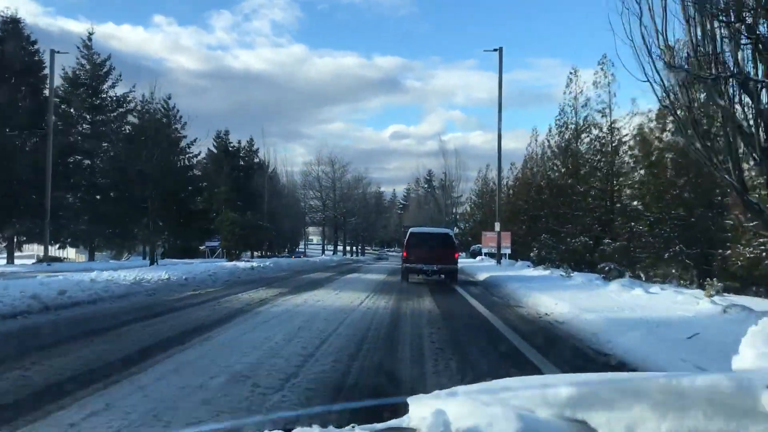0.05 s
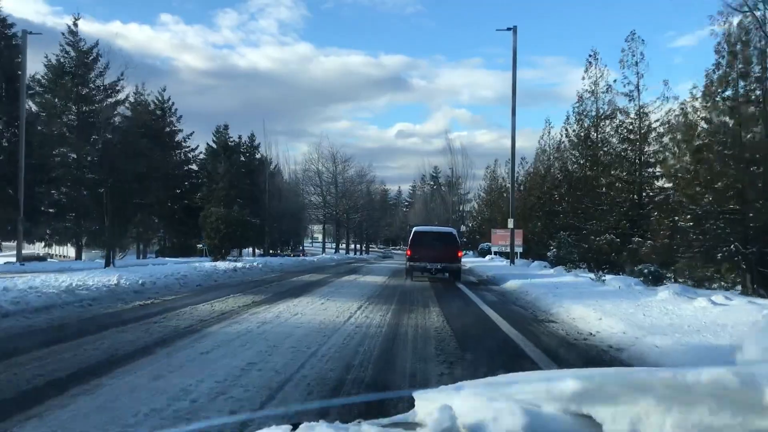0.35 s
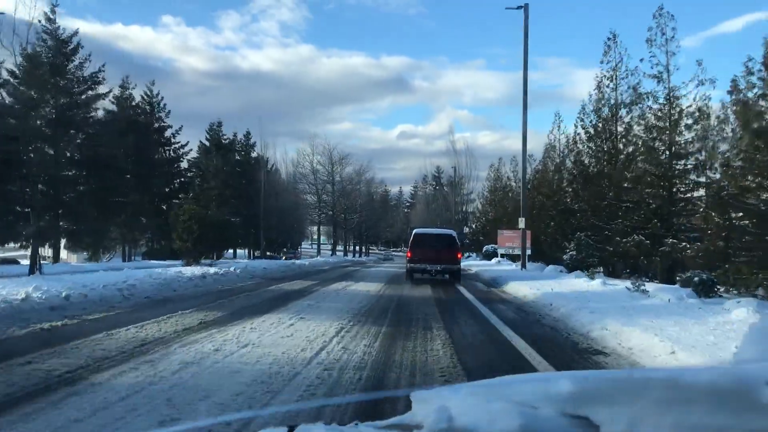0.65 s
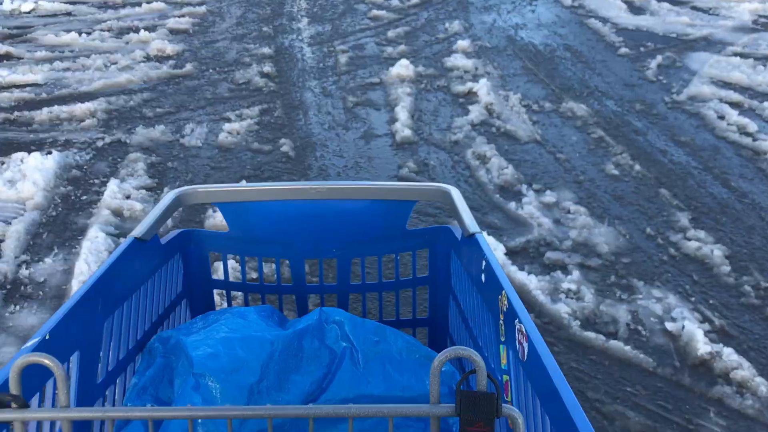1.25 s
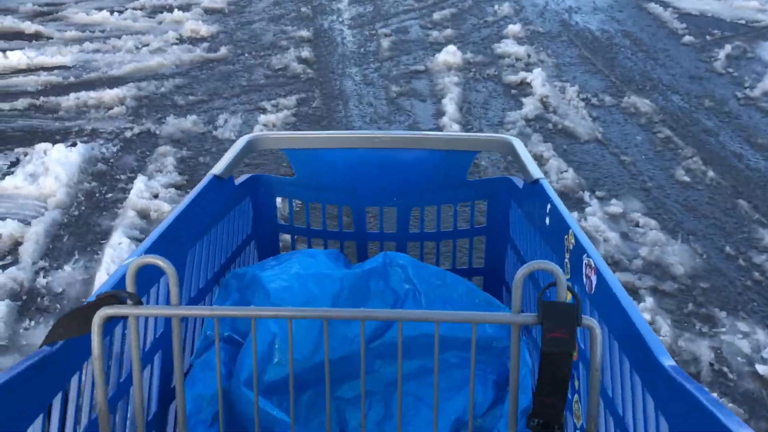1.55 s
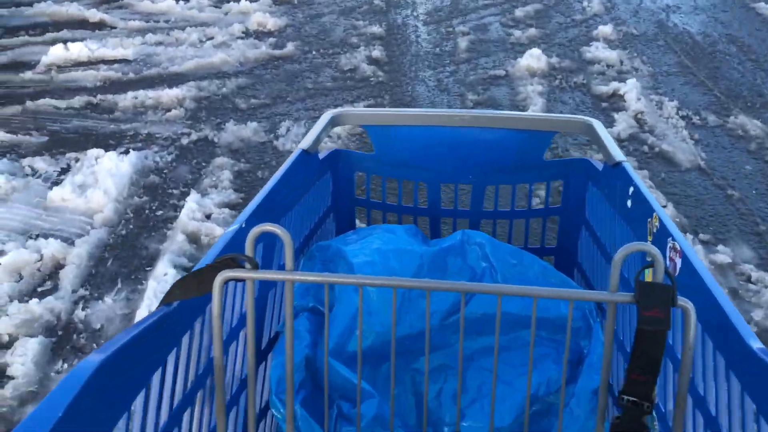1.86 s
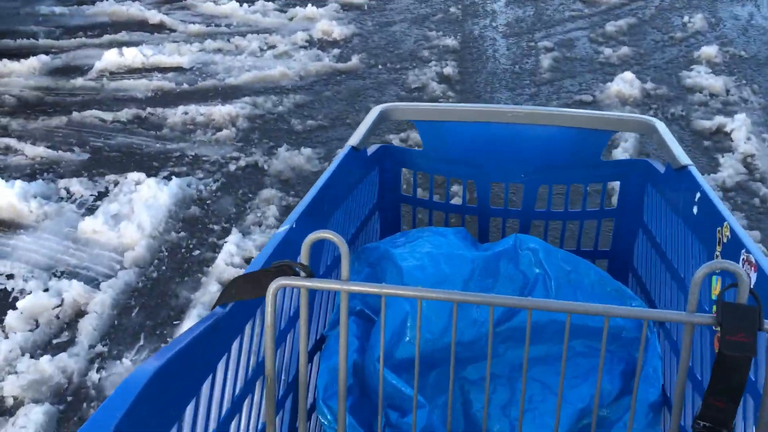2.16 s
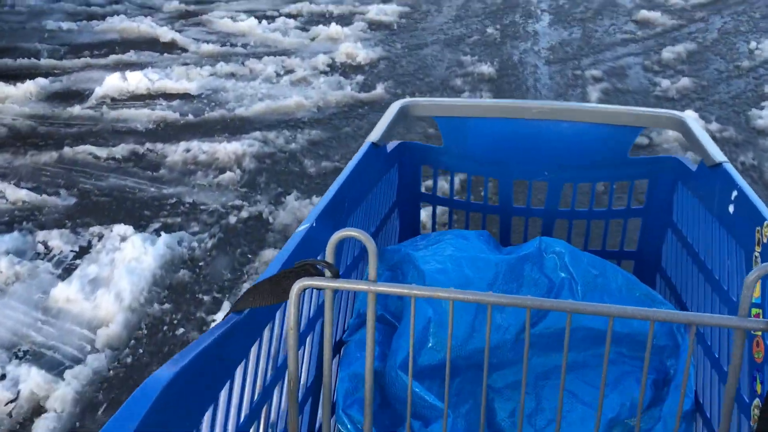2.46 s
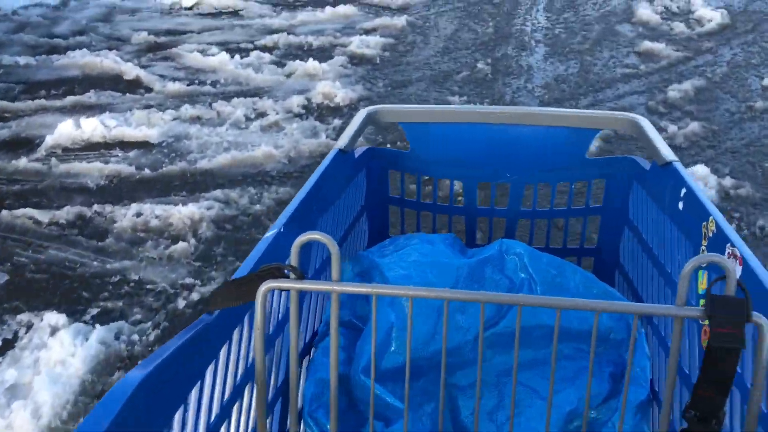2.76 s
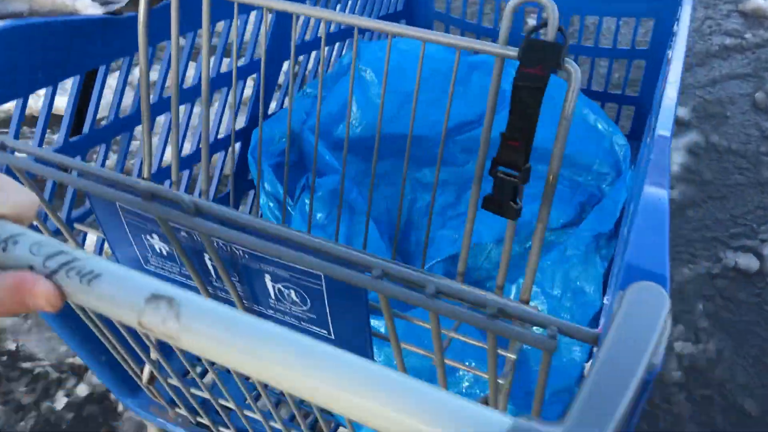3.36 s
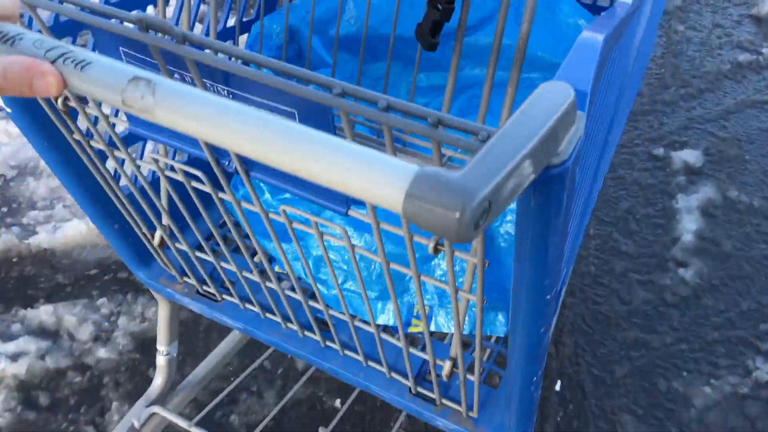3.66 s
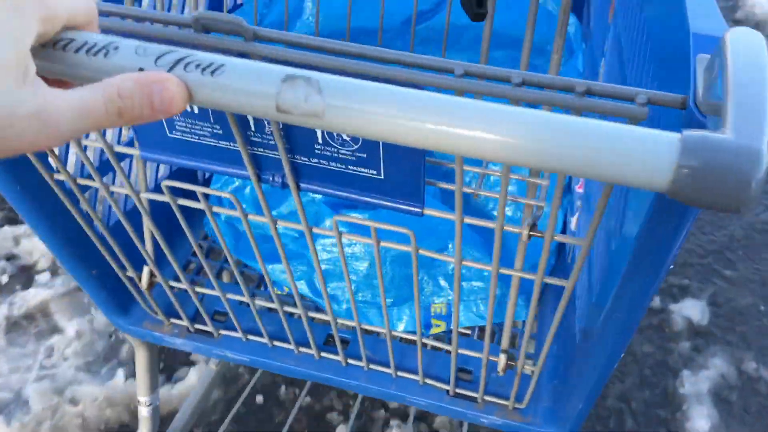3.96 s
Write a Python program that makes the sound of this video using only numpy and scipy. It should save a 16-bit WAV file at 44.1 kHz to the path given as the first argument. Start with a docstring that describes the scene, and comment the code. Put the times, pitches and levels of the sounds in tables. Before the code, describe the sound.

Brief car cabin rumble cuts to a plastic shopping cart clattering across slushy pavement.

```python
"""Inside a car on a snowy road: the cabin rumbles and the tyres hiss faintly. At 1.3 s, an abrupt change to
a plastic shopping cart pushed over slushy pavement. Its wheels crunch, the wire gate and casters rattle
in bright bursts, ruts thump the basket and it clacks on its frame. Ice snaps near 1.6 s, then the wheels
skid now and then. Three jolts ring the basket walls; the loudest rattle and clack come near 3.8 s."""
import sys
import numpy as np
from scipy import signal
from scipy.fft import rfft, irfft
from scipy.io import wavfile
from scipy.ndimage import uniform_filter1d

SR = 44100
rng = np.random.default_rng(int(sys.argv[2]) if len(sys.argv) > 2 else 0)


def wav_out(sig):
    """Save sig, one row per channel (or a flat mono array), as 16-bit PCM at SR to the path in sys.argv[1]."""
    wavfile.write(sys.argv[1], SR, np.round(np.clip(np.atleast_2d(sig).T, -1, 1) * 32767).astype(np.int16))


N = 176400
T = np.arange(N) / SR
CART_START_S, TOP_HZ = 1.306, 15880
GRAINS_PER_S, GRAIN_SPREAD_DB = 6000, 2.3
CONTACTS_PER_S, CONTACT_SPREAD_DB, CONTACT_T20_S, CLICK_ENERGY_RATIO = 1500, 2.5, 0.016, 0.23


def undb(db):
    """Decibels to gain."""
    return 10 ** (np.asarray(db) / 20)


def unit_rms(x):
    """Scale to rms 1."""
    return x / np.sqrt(np.mean(x ** 2) + 1e-18)


def level_curve(rows, column=1):
    """Gain over time from a table's dB column."""
    rows = np.array(rows)
    return undb(np.interp(T, rows[:, 0], rows[:, column]))


def colour(x, spectrum, tilt_db_per_oct=0):
    """Filter by (Hz, dB) points and a tilt, 24 dB per octave down beyond the ends; rms 1."""
    hz, db = np.array(spectrum).T
    octave = np.log2(np.fft.rfftfreq(len(x), 1 / SR) + 1)
    in_band = np.clip(octave, np.log2(hz.min()), np.log2(hz.max()))
    gain_db = np.interp(in_band, np.log2(hz), db) + tilt_db_per_oct * in_band - 24 * abs(octave - in_band)
    return unit_rms(irfft(rfft(x) * undb(gain_db), len(x)))


def drift(rate_hz):
    """Slow random drift; rms 1."""
    hold = max(int(SR / rate_hz), 1)
    steps = np.repeat(rng.standard_normal(N // hold + 1), hold)
    return unit_rms(uniform_filter1d(steps, hold)[:N])


def grains(n, per_s, spread_db):
    """Tiny impacts at random moments: many weak, a few strong."""
    size = undb(spread_db * np.minimum(rng.exponential(size=n), 3.3))
    return (rng.random(n) < per_s / SR) * size * rng.choice([-1, 1], n)


def chatter(n, parts=3):
    """Loose parts touch repeatedly; each contact clicks and rings briefly."""
    t, out = T[:SR // 16], 0
    for _ in range(parts):
        ring = unit_rms(rng.standard_normal(len(t)) * undb(-20 * t / CONTACT_T20_S)) / np.sqrt(len(t))
        ring[0] += np.sqrt(CLICK_ENERGY_RATIO)
        contacts = grains(n + len(t), CONTACTS_PER_S / parts, CONTACT_SPREAD_DB)
        out = out + signal.fftconvolve(contacts, ring)[len(t):len(t) + n]
    return out


def burst(rise_s, fall_db_per_s):
    """Envelope: linear rise, exponential fall."""
    t = T[:SR // 2]
    return np.minimum(t / rise_s, 1) * undb(-fall_db_per_s * np.maximum(t - rise_s, 0))


def add(out, start_s, sound):
    """Mix a sound in at start_s."""
    i = int(start_s * SR)
    out[i:i + len(sound)] += sound[:N - i]


def resonate(drive, modes):
    """Decaying modes, each at its level relative to the drive."""
    t, out = T[:SR // 3], 0
    for hz, db, t60_s in modes:
        ring = np.sin(2 * np.pi * hz * t) * undb(-60 * t / t60_s)
        out = out + undb(db) * unit_rms(signal.fftconvolve(drive, ring)[:N])
    return np.std(drive) * out


# Cabin and tyre spectra: freq_hz, density_db
CABIN_SPECTRUM = [(20, -40), (28, -10), (36, -3.5), (50, 1.5), (64, 0.5), (88, -5), (108, -1.5), (127, 1.5),
                  (145, -10), (175, -29)]
TYRE_SPECTRUM = [(150, 21.5), (200, 24.5), (262, 22), (300, 19), (330, 16.5), (420, 6.5), (560, 8.5),
                 (750, 5.5), (1000, 4.5), (1600, -7), (2700, -8.5), (4500, -13), (6500, -19), (9500, -21.5),
                 (10500, -27), (16000, -28.5)]
# Cabin and tyre levels: time_s, level_db
CABIN_LEVEL = [(0, -18), (.14, -24.5), (.28, -24), (.42, -26.5), (.53, -31.5), (.95, -29), (1.3, -30.5)]
TYRE_LEVEL = [(0, -36.5), (.37, -39), (.7, -39), (1.3, -39.5)]

def car():
    """The cabin booms as the body shakes; tyres roar and hiss faintly through the glass."""
    cabin = colour(rng.standard_normal(N), CABIN_SPECTRUM) * level_curve(CABIN_LEVEL)
    tyres = colour(rng.standard_normal(N), TYRE_SPECTRUM) * level_curve(TYRE_LEVEL)
    return cabin + tyres * undb(0.29 * drift(rate_hz=10.4))


# Rolling on slush: time_s, crunch_db, rumble_db
ROLL_LEVELS = [(1.31, -38, -51), (1.45, -38, -44.5), (1.68, -36.5, -46), (1.78, -37, -39.5),
               (1.92, -34.5, -39.5), (2.08, -37.5, -38), (2.2, -35.5, -36), (2.3, -39, -37),
               (2.38, -34.5, -41), (2.52, -30.5, -33), (2.6, -36, -35), (2.82, -34.5, -39),
               (2.99, -38.5, -39), (3.17, -36, -41), (3.29, -33, -40.5), (3.37, -31, -33.5),
               (3.56, -33, -33), (3.66, -31, -36), (3.85, -29.5, -34.5), (4.0, -31, -37.5)]
# Wheel crunch spectrum: freq_hz, density_db
CRUNCH_SPECTRUM = [(150, -16), (300, 0.5), (450, -3), (700, 1.5), (850, -1.5), (1200, 4.5), (2000, 1),
                   (3000, 0), (4500, -4), (6500, -10.5), (9000, -9), (16000, -37)]

def wheel_crunch(flicker_db=1.4):
    """Icy grains crush under the wheels in uneven patches."""
    crunch = colour(grains(N, GRAINS_PER_S, GRAIN_SPREAD_DB), CRUNCH_SPECTRUM)
    return crunch * level_curve(ROLL_LEVELS) * undb(flicker_db * drift(rate_hz=45))


# Basket rumble spectrum: freq_hz, density_db
RUMBLE_SPECTRUM = [(22, -36), (35, -5), (50, 2.5), (85, -2.5), (115, -7), (170, -9.5), (280, -15),
                   (400, -21), (900, -52)]

def basket_rumble():
    """Rough ground shakes the basket."""
    return colour(rng.standard_normal(N), RUMBLE_SPECTRUM) * level_curve(ROLL_LEVELS, column=2)


# Wheel skids: start_s, level_db, rise_s
SKIDS = [(1.735, -35, .025), (1.810, -32.5, 0.011), (1.875, -33.5, .03), (2.105, -39, 0.0094),
         (2.654, -39, 0.011), (2.772, -29.5, .03), (2.915, -35.5, 0.014), (3.348, -31, 0.016),
         (3.805, -28.5, 0.04)]
# Skid spectrum: freq_hz, density_db
SKID_SPECTRUM = [(450, -27), (950, 0), (1400, 0), (2100, 1.5), (2800, -4.5), (4200, -7.5), (6000, -25)]

def wheel_skids():
    """A wheel slides sideways and grinds through the slush."""
    out = np.zeros(N)
    for start_s, db, rise_s in SKIDS:
        envelope = burst(rise_s, fall_db_per_s=260)
        grind = colour(grains(len(envelope), GRAINS_PER_S, GRAIN_SPREAD_DB), SKID_SPECTRUM)
        add(out, start_s, undb(db) * envelope * grind)
    return out


# Ice snaps: start_s, peak_db
SNAPS = [(1.6147, -21), (1.6236, -19), (1.6483, -15), (1.681, -25)]
# Snap spectrum: freq_hz, density_db
SNAP_SPECTRUM = [(1500, -8), (4500, -8), (7000, -3), (9000, 1), (10500, -13), (16000, -11)]

def ice_snaps(fizz_db=-12.5, fall_db_per_s=1100):
    """Ice breaks under a wheel: one sharp crack and a short fizz."""
    out, t = np.zeros(N), T[:SR // 16]
    for start_s, peak_db in SNAPS:
        snap = undb(fizz_db - fall_db_per_s * t) * rng.standard_normal(len(t))
        snap[SR // 2000] += 1  # the crack
        snap = colour(snap, SNAP_SPECTRUM)
        add(out, start_s, undb(peak_db) * snap / abs(snap).max())
    return out


# Hollow basket bumps: start_s, level_db
BUMPS = [(2.132, -21.5), (3.338, -26.5), (3.655, -24)]
# Basket wall modes: pitch_hz, gain_db, t60_s
WALL_MODES = [(148, -2, 0.086), (253, -5, 0.17), (313, -4, 0.098)]

def wall_bumps(rise_s=0.0083, detune_spread=0.024):
    """Hard jolts flex the basket walls, which give a short hollow note."""
    out, t = np.zeros(N), T[:SR // 4]
    for start_s, db in BUMPS:
        note = 0
        for hz, gain_db, t60_s in WALL_MODES:
            detuned_hz = hz * (1 + detune_spread * rng.standard_normal())
            note = note + undb(gain_db - 60 * t / t60_s) * np.sin(2 * np.pi * detuned_hz * t)
        add(out, start_s, undb(db) * np.minimum(t / rise_s, 1) * note)
    return out


# Rut thumps: start_s, level_db, pitch_hz, knock_relative_db
THUMPS = [(1.447, -30, 62, -3), (1.924, -34, 56.6, -2.5), (2.003, -27.5, 65.4, -5),
          (2.147, -24.5, 56.3, -9), (2.432, -25.5, 61, -4), (2.610, -19.5, 72, -13), (2.735, -23, 92, -10),
          (2.83, -17, 68, -14), (2.893, -25, 64, -26), (2.936, -25.5, 70.6, -12), (3.03, -28.5, 93, -4.5),
          (3.078, -27.5, 59.5, -17), (3.327, -19.5, 78, -5.5), (3.485, -20.5, 85, -4.5),
          (3.534, -23, 89, -20), (3.583, -20, 78, -6)]
# Dull knock spectrum: freq_hz, density_db
KNOCK_SPECTRUM = [(70, -18), (115, 7.5), (170, -10), (300, -5.5), (500, -26), (1000, -43)]

def rut_thumps(trim_db=-3):
    """Each rut knocks the basket and sets it swinging for a few cycles."""
    out = np.zeros(N)
    swing = burst(rise_s=0.01, fall_db_per_s=412)
    jolt = burst(rise_s=0.015, fall_db_per_s=332)
    for start_s, db, hz, knock_db in THUMPS:
        boom = swing * np.sqrt(2) * np.sin(2 * np.pi * hz * T[:len(swing)])
        knock = undb(knock_db) * jolt * colour(rng.standard_normal(len(jolt)), KNOCK_SPECTRUM)
        add(out, start_s, undb(db + trim_db) * (boom + knock))
    return out


# Basket clacks: start_s, level_db, tilt_db_per_oct
CLACKS = [(1.490, -38, -4.5), (1.817, -38, 0), (1.903, -28.5, 4), (1.973, -32, -4.5), (2.002, -29, -2.5),
          (2.168, -30, -3), (2.387, -39, -5), (2.470, -27, -1.5), (2.529, -35.5, -3), (2.622, -31.5, -3.5),
          (3.110, -36, -5), (3.209, -28.5, -3.5), (3.316, -33, -6), (3.440, -25, -2.5), (3.608, -25.5, -2),
          (3.657, -24, -1), (3.723, -23.5, -1), (3.812, -18, 5.5)]
# Clack spectrum: freq_hz, density_db
CLACK_SPECTRUM = [(100, -4.5), (280, -4), (420, -8), (650, -1.5), (1200, 0.5), (2400, 2.5), (3600, 2),
                  (6000, -9.5), (16000, -16)]

def basket_clacks(trim_db=0.5):
    """The plastic basket chatters against the frame."""
    out = np.zeros(N)
    envelope = burst(rise_s=0.0077, fall_db_per_s=426)
    for start_s, db, tilt_db_per_oct in CLACKS:
        contacts = colour(chatter(len(envelope)), CLACK_SPECTRUM, tilt_db_per_oct)
        add(out, start_s, undb(db + trim_db) * envelope * contacts)
    return out


# Basket and frame modes: pitch_hz, gain_db, t60_s
FRAME_MODES = [(312, -29, .12), (507.6, -24.5, 0.25), (673.5, -21.5, 0.12), (900, -30, 0.53),
               (1008, -18, 0.092), (1240, -31, 0.17), (1564, -32, .09), (1730, -24, 0.086),
               (2056, -25.5, 0.13), (2169, -19, 0.051), (2424, -27, 0.1), (2693, -22, 0.039),
               (3170, -28, 0.1)]

def frame_ring(drive):
    """Vibration rings the basket and frame."""
    return resonate(drive, FRAME_MODES)


# Gate and caster rattles: start_s, level_db, rise_s, fall_db_per_s
RATTLES = [(1.309, -37.5, 0.0024, 89), (1.401, -35.5, 0.0026, 397), (1.474, -36, 0.0037, 133),
           (1.494, -27, 0.0038, 300), (1.528, -38.5, 0.006, 138), (1.555, -34, 0.0046, 125),
           (1.706, -29, 0.007, 120), (1.742, -31, 0.0071, 288), (1.780, -29, 0.0039, 138),
           (1.813, -28.5, 0.0033, 294), (1.871, -31.5, 0.004, 140), (1.899, -30.5, 0.0067, 242),
           (1.974, -30, 0.0027, 198), (2.059, -32.5, .002, 260), (2.112, -31, 0.0014, 226),
           (2.152, -27, .006, 241), (2.166, -23.5, 0.016, 271), (2.321, -28.5, 0.015, 300),
           (2.36, -37, 0.01, 216), (2.435, -31.5, 0.0032, 242), (2.454, -23, .002, 258),
           (2.511, -24.5, 0.01, 203), (2.540, -27.5, 0.0052, 240), (2.608, -33, .003, 214),
           (2.669, -31, 0.0033, 174), (2.754, -31, 0.0066, 129), (2.790, -30.5, 0.0037, 203),
           (2.829, -35.5, 0.0085, 148), (2.911, -38.5, 0.004, 118), (3.023, -32.5, 0.0015, 280),
           (3.073, -32.5, 0.0022, 200), (3.085, -30, .003, 150), (3.111, -29, 0.0034, 335),
           (3.215, -33, 0.022, 124), (3.303, -26.5, 0.012, 257), (3.342, -21.5, 0.015, 203),
           (3.447, -29.5, 0.0066, 188), (3.474, -28.5, 0.0052, 106), (3.567, -27.5, 0.016, 112),
           (3.630, -23.5, 0.029, 114), (3.742, -22, 0.041, 103), (3.803, -18, 0.0077, 222),
           (3.846, -29, 0.011, 141), (3.918, -29, 0.009, 146)]
# Steel contact spectrum: freq_hz, density_db
RATTLE_SPECTRUM = [(250, -24), (700, -2.5), (1500, -8.5), (3000, 0.5), (4500, 0), (6200, 0), (8200, 3.5),
                   (10300, 0), (11300, 2), (13500, 2), (15600, -1.5)]
# Steel wire modes: pitch_hz, gain_db, t60_s
WIRE_MODES = [(3555, -24, .1), (4100, -25, .1), (5550, -25, .14), (7850, -24, .14), (8226, -14.5, .24),
              (8586, -18, .2), (9588, -26, .14), (10891, -20, .2), (11306, -24, .16), (11500, -21, .18),
              (12505, -25, .18), (15365, -25, .12), (15526, -25, .14)]
# Wire ring strength: time_s, gain_db
WIRE_GAIN = [(1.5, -2), (1.8, -4.5), (2.7, 2.5), (3.1, -10), (3.8, -19)]

def steel_rattles(trim_db=0.5):
    """Each jolt sets off a shower of metal contacts that ring the wires."""
    out = np.zeros(N)
    for start_s, db, rise_s, fall_db_per_s in RATTLES:
        envelope = burst(rise_s, fall_db_per_s)
        contacts = colour(chatter(len(envelope)), RATTLE_SPECTRUM)
        add(out, start_s, undb(db + trim_db) * envelope * contacts)
    return out + level_curve(WIRE_GAIN) * resonate(out, WIRE_MODES)


def scene():
    """First the car, then the cart; mono."""
    drive = wheel_crunch() + wheel_skids() + basket_clacks()
    cart = drive + frame_ring(drive) + steel_rattles() + ice_snaps()
    cart += wall_bumps() + basket_rumble() + rut_thumps()
    car_gate = np.interp(T, [0, .004, CART_START_S - .008, CART_START_S], [0, 1, 1, 0])
    cart_gate = np.clip((T - CART_START_S) / .002, 0, 1)
    return (car() * car_gate + cart * cart_gate)[None]


def record(dry):
    """Steep low-pass at TOP_HZ."""
    return signal.sosfilt(signal.ellip(10, .2, 80, TOP_HZ, fs=SR, output="sos"), dry)


dry = scene()
out = record(dry)
wav_out(out)
```